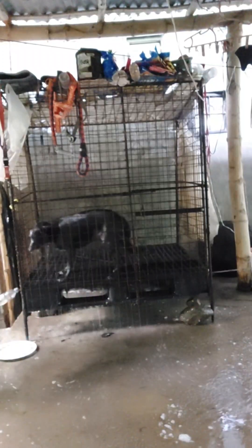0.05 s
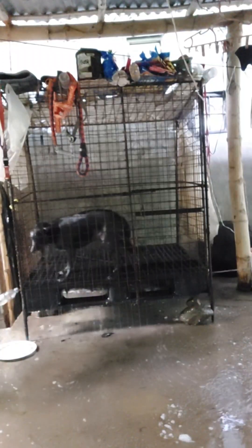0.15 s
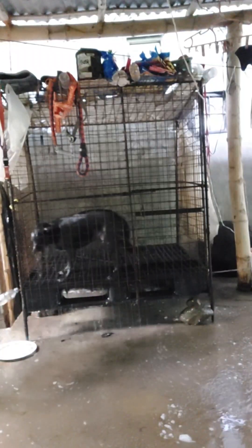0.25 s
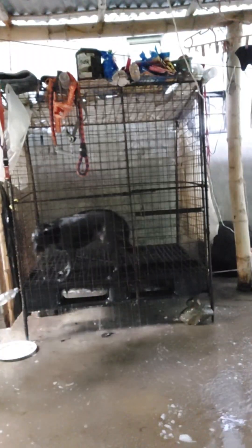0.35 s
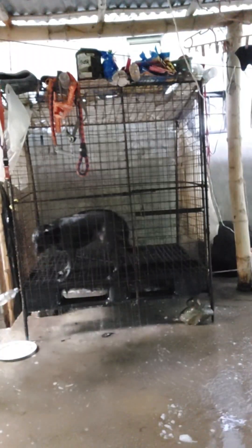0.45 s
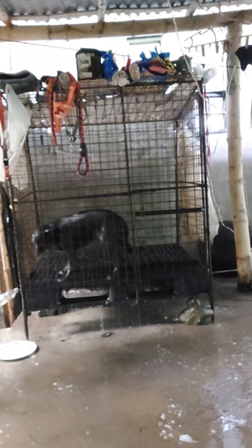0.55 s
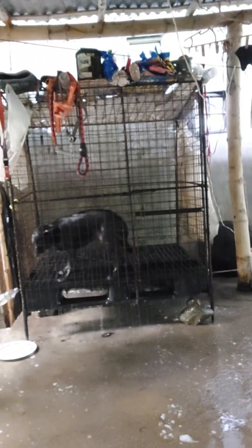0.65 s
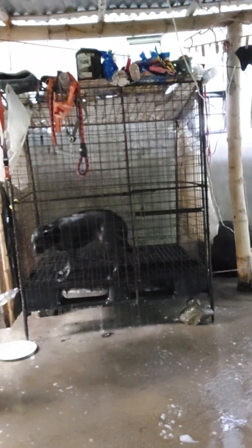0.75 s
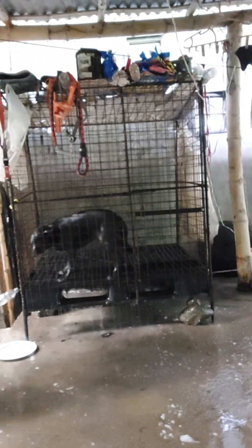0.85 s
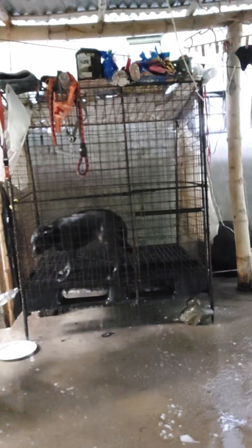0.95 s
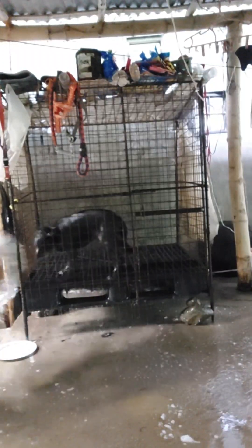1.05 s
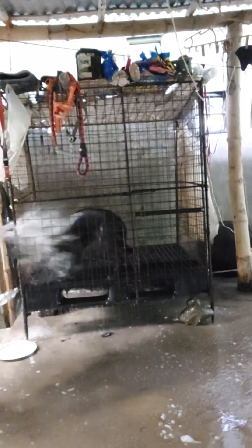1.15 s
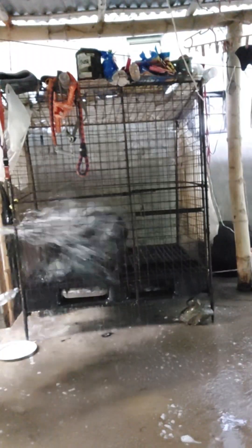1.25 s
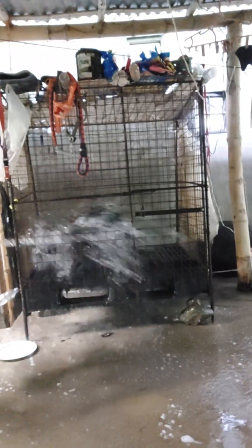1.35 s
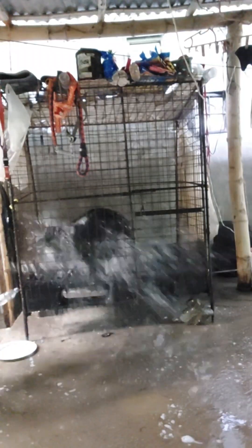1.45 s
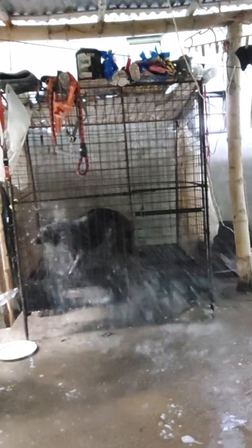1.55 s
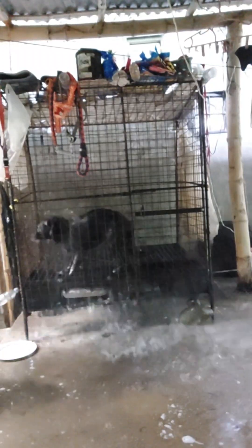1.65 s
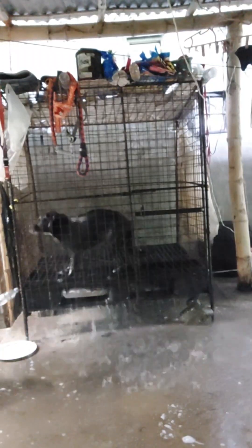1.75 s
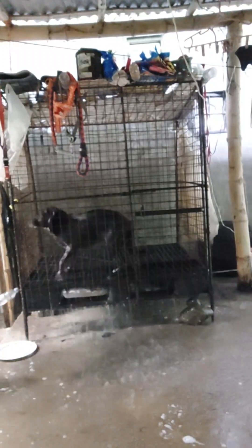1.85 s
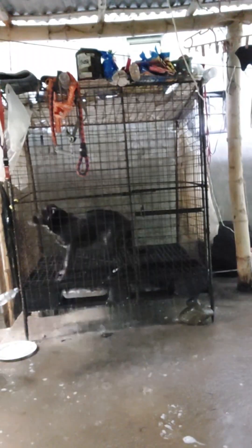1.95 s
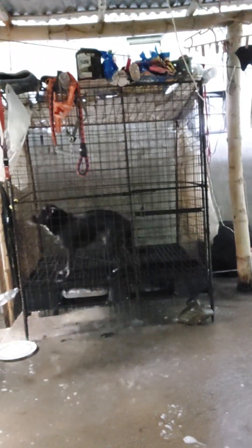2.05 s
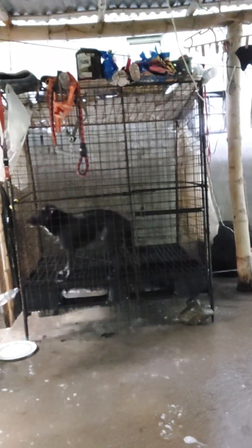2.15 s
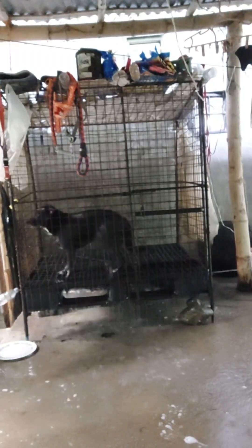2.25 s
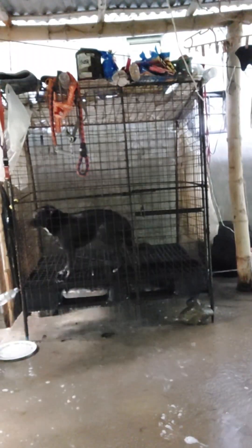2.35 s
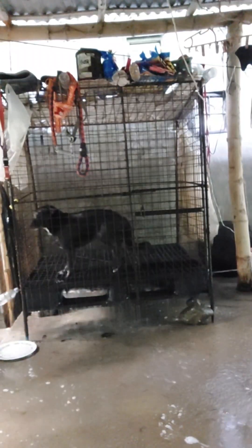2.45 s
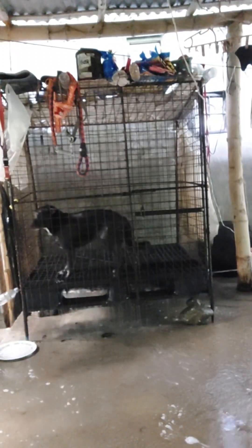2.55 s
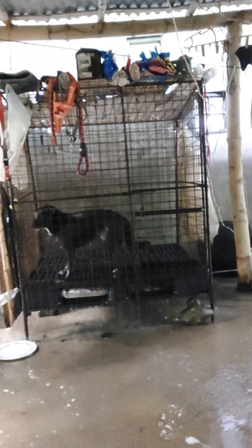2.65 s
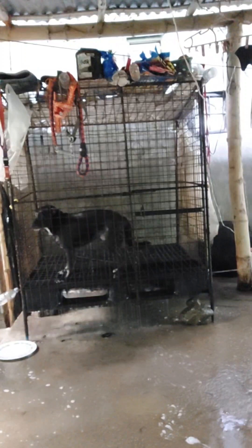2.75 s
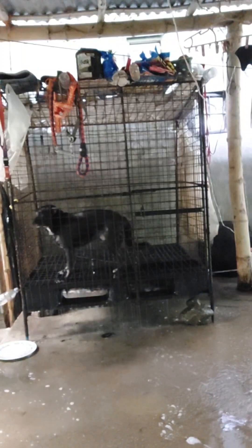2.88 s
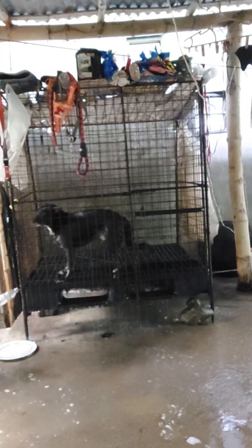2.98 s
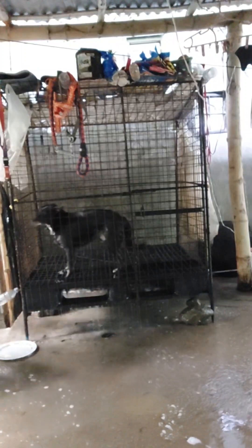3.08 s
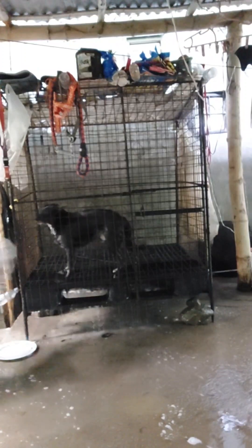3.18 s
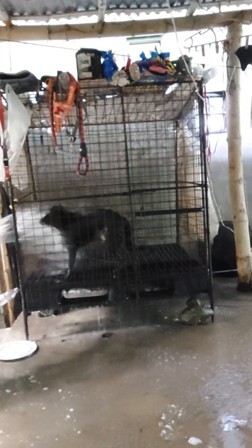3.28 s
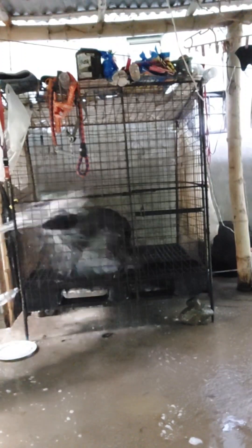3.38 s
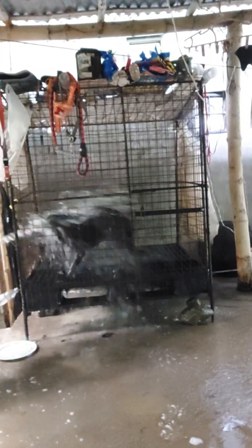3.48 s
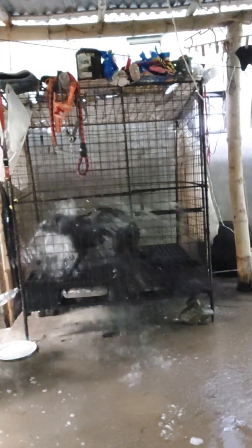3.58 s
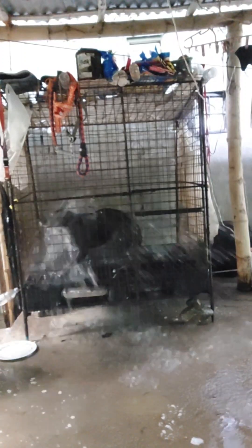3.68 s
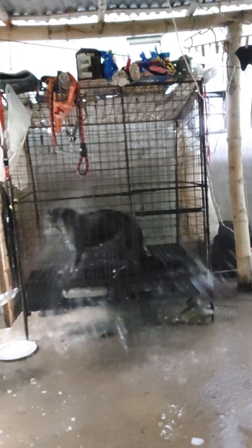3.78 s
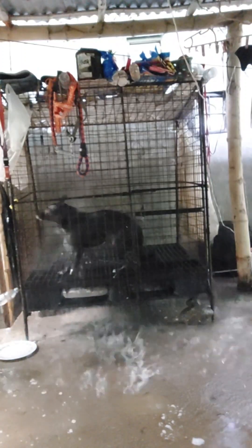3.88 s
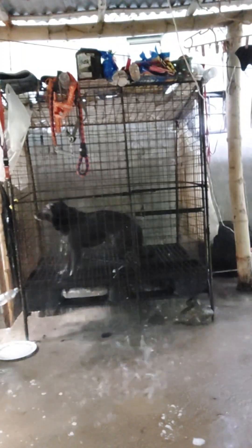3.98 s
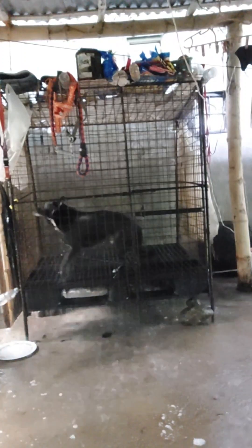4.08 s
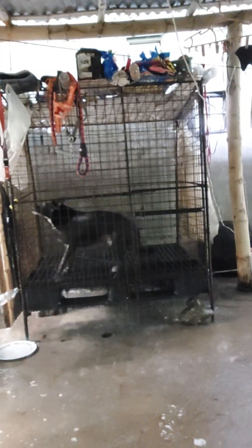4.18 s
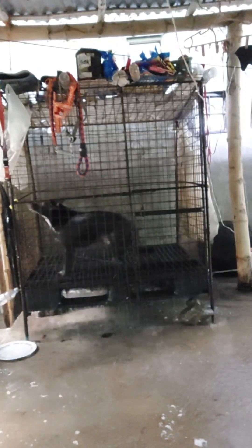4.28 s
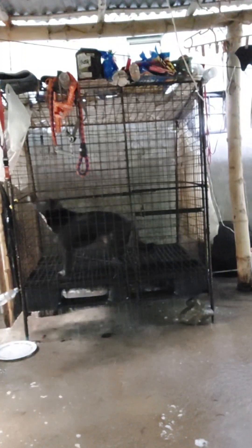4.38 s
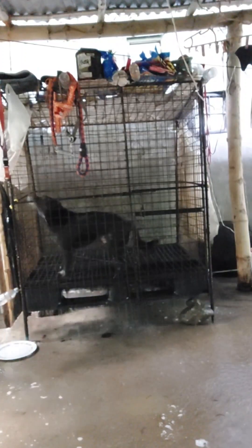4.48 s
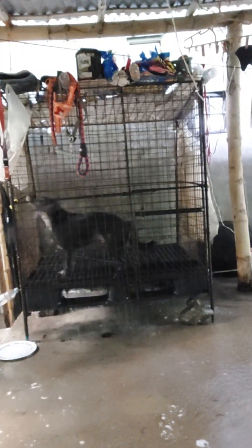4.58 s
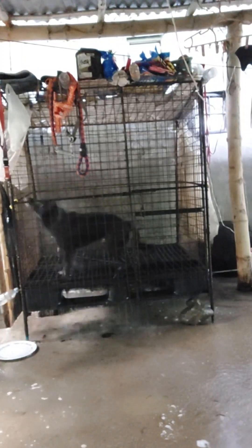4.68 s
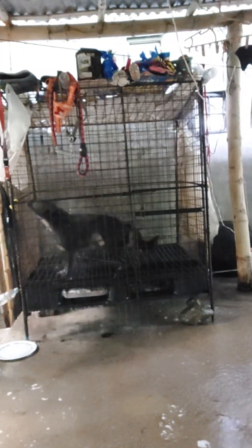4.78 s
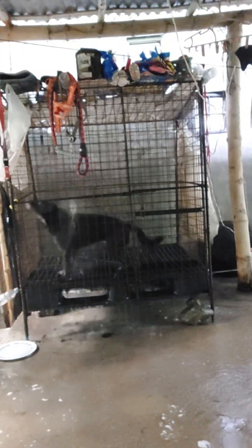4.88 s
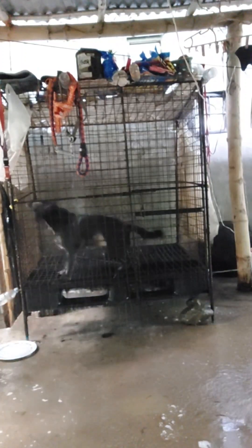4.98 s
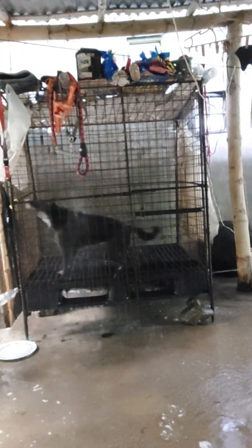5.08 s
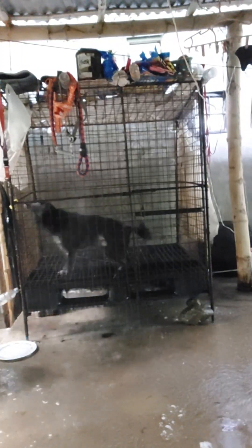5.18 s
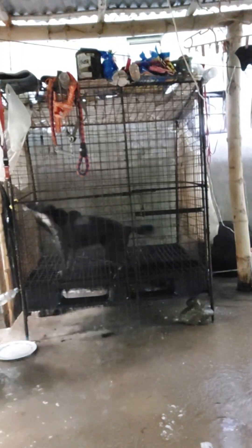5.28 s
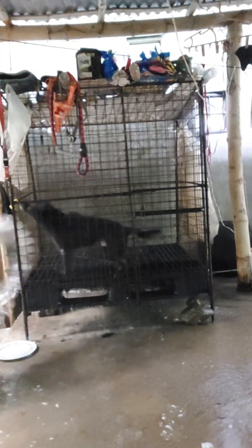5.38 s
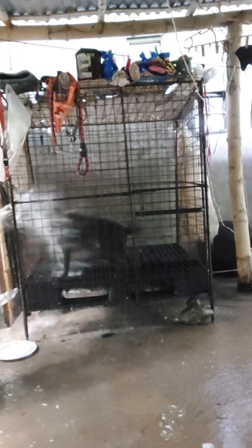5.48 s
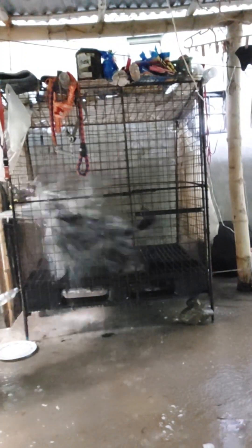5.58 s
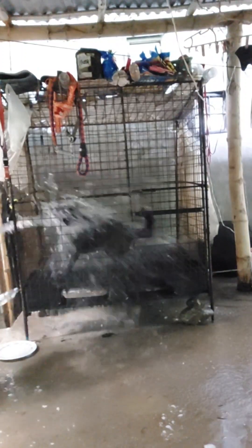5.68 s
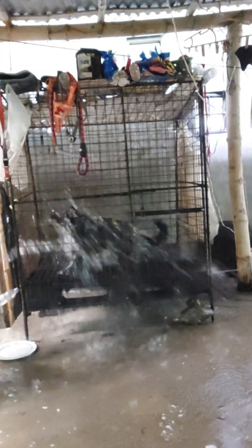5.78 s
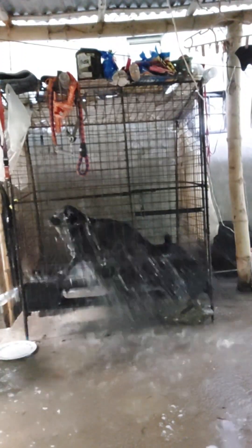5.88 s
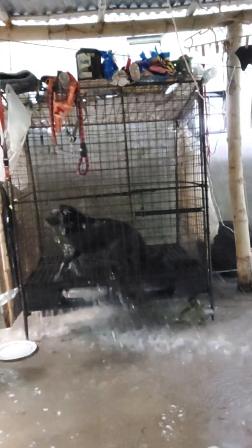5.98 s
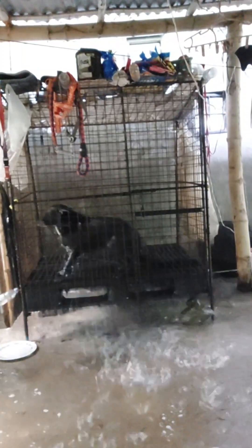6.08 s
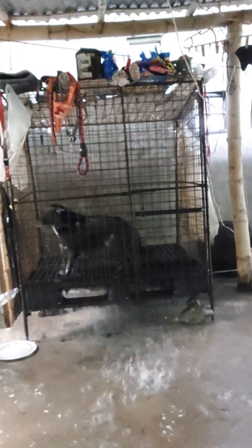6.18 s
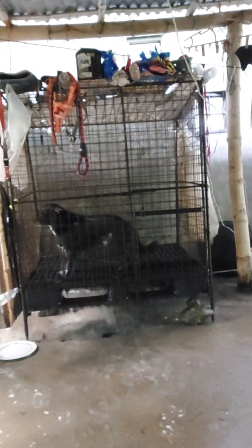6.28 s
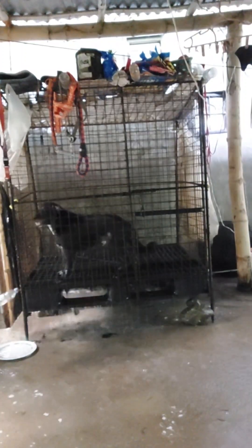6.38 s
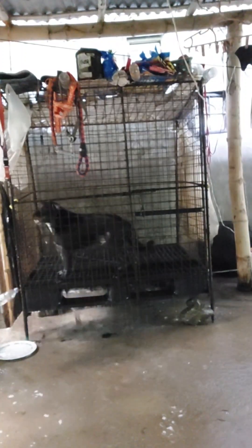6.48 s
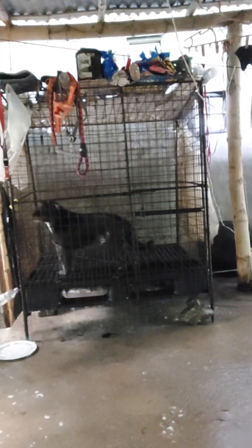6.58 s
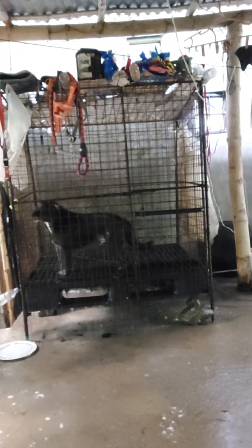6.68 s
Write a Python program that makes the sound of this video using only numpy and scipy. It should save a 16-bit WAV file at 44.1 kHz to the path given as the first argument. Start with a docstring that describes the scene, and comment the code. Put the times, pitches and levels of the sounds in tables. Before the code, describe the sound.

Water is thrown three times in a shed, bursting sharply then spattering down, between drips and gurgles; insects hiss and distant traffic rumbles.

```python
"""Under a shed roof, microphones near a wet concrete floor: drops plop and the scoop stirs its bucket.
Then three times a scoop of water bursts on a wire cage and, a moment later, rains down on the floor.
After each throw the cage drips, water sloshes and bubbles ring, and the scoop knocks on the bucket;
slaps are bursts of shaped noise, bubbles and bucket are ringing sines, the falling water is random drops.
All along, cicadas hiss and far traffic rumbles as coloured noise; a distant aircraft tone slowly sinks."""
import sys
import numpy as np
from scipy import signal
from scipy.fft import rfft, irfft
from scipy.io import wavfile

SR = 44100
rng = np.random.default_rng(int(sys.argv[2]) if len(sys.argv) > 2 else 0)


def wav_record(signal):
    """Record a signal, one row per channel, as 16-bit PCM in the file named by sys.argv[1]."""
    frames = np.transpose(np.atleast_2d(signal))
    bounded = np.clip(frames, -1, 1)
    # unit amplitude maps onto the largest positive 16-bit level
    quanta = np.round(bounded * 32767).astype(np.int16)
    wavfile.write(sys.argv[1], SR, quanta)


N = 297057   # samples

# Relative spectra of fine mist, sheets of water, and gurgling bubbles: pitch_hz, level_db (per Hz)
MIST_SPECTRUM = [(2350, -11.5), (4000, -9.5), (6240, 3), (8650, -0.5), (15100, 7), (16200, -22),
                 (16500, -50)]
SHEET_SPECTRUM = [(900, -19), (1500, -10), (2200, 1), (3500, 1), (5000, 4), (7000, -3), (10000, -31)]
GURGLE_SPECTRUM = [(250, 8), (450, -2), (700, 1.5), (1100, -1.5), (1700, 0), (2500, -4), (4000, -10)]
GUST_CORNER_HZ = 22
GUST_MIST_DB, GUST_SHEETS_DB, GUST_GURGLE_DB = 1.2, 1.6, 1.5   # per unit of gust


def falling_water():
    """Mist crackles, sheets of water fizz, pool and bucket gurgle with bubbles that ring longer."""
    sheet_level, mist_level, gurgle_level = water_levels()
    gusts = np.clip(drift(GUST_CORNER_HZ), -2, 2)      # water lands in handfuls, all sizes at once
    mist = droplets(MIST_SPECTRUM, per_s=4000, uneven_db=2.5, cycles=2.3, clump_db=1.0, count=8)
    sheets = droplets(SHEET_SPECTRUM, per_s=1800, uneven_db=2.0, cycles=8.2, clump_db=2.0, count=12)
    small = droplets(SHEET_SPECTRUM, per_s=1500, uneven_db=2.0, cycles=73.0, clump_db=2.5, count=36)
    large = droplets(GURGLE_SPECTRUM, per_s=1000, uneven_db=2.5, cycles=42.0, clump_db=2.5, count=30)
    large = large + 0.21 * large[::-1]      # deep bubbles reach both microphones
    fizz = from_db(-6.5) * sheets + from_db(-5.0) * small

    mist_gain = mist_level * from_db(GUST_MIST_DB * gusts)
    fizz_gain = sheet_level * from_db(GUST_SHEETS_DB * gusts)
    gurgle_gain = gurgle_level * from_db(GUST_GURGLE_DB * gusts)
    return (mist_gain * panned(-2.0)[:, None] * mist
            + fizz_gain * panned(-0.095)[:, None] * fizz
            + gurgle_gain * panned(-0.79)[:, None] * large)


# In these three tables full_s is the moment the water reaches its full level.
# Each scoopful bursts on the wire cage:
# full_s, hold_s, sheets_db, mist_db, sheets_fade_db_per_s, mist_fade_db_per_s
CAGE_BURSTS = [(1.184, 0.017, -33.5, -34.5, 23, 14), (3.375, 0.062, -33, -33, 51, 39),
               (5.53, 0.068, -31.5, -33.5, 105, 18)]
# Then it rains down on the floor: full_s, hold_s, sheets_db, mist_db, rise_db_per_s, fade_db_per_s
FLOOR_LANDINGS = [(1.589, 0.19, -33, -30, 260, 296), (3.794, 0.16, -42, -34.5, 106, 112),
                  (6.013, 0.086, -30, -28, 152, 102)]
# The scoop stirs bucket and puddle: full_s, hold_s, gurgle_db, sheets_db
SCOOP_SLOSHES = [(0.0, 0.024, -47, -47), (0.182, 0.047, -45.5, -42), (1.198, .01, -48, -46),
                 (1.297, 0.047, -45.5, -36), (1.44, 0.1, -43.5, -40), (1.57, 0.0088, -42, -56),
                 (1.874, 0.018, -44.5, -38), (2.11, 0.11, -46.5, -48.5), (2.247, 0.26, -52.5, -62),
                 (2.542, .03, -49, -45), (3.357, 0.028, -43.5, -42), (3.603, 0.15, -47.5, -63),
                 (3.753, 0.32, -47, -44.5), (4.095, 0.41, -46.5, -53), (4.511, 0.16, -43, -42),
                 (4.79, 0.22, -52.5, -59), (5.124, 0.27, -47.5, -55), (5.52, 0.09, -39.5, -37),
                 (5.765, 0.56, -48, -42.5), (6.45, 0.034, -45, -50), (6.628, 0.14, -48.5, -61)]
BURST_RISE_DB_PER_S = 900
EARLIER_THROW_S = -0.56   # end of the throw before
DRIP_SHEETS_DB, DRIP_MIST_DB, DRIP_FADE_DB_PER_S = -47.5, -44, 5.5
SLOSH_RISE_DB_PER_S, SLOSH_FADE_DB_PER_S = 309, 89


def water_levels():
    """Amplitudes of sheets, mist and gurgle: throws, drips and sloshes add in power."""
    sheets = mist = gurgle = 0
    for full_s, hold, sheets_db, mist_db, sheets_fade, mist_fade in CAGE_BURSTS:
        sheets = sheets + swell(full_s, hold, sheets_db, BURST_RISE_DB_PER_S, sheets_fade)
        mist = mist + swell(full_s, hold, mist_db, BURST_RISE_DB_PER_S, mist_fade)
    for full_s, hold, sheets_db, mist_db, rise, fade in FLOOR_LANDINGS:
        sheets = sheets + swell(full_s, hold, sheets_db, rise, fade)
        mist = mist + swell(full_s, hold, mist_db, rise, fade)
    # the wet cage drips after each landing
    drips_full_s = [EARLIER_THROW_S] + [full_s + hold for full_s, hold, *rest in FLOOR_LANDINGS]
    for full_s in drips_full_s:
        sheets = sheets + swell(full_s, 0, DRIP_SHEETS_DB, BURST_RISE_DB_PER_S, DRIP_FADE_DB_PER_S)
        mist = mist + swell(full_s, 0, DRIP_MIST_DB, BURST_RISE_DB_PER_S, DRIP_FADE_DB_PER_S)
    for full_s, hold, gurgle_db, sheets_db in SCOOP_SLOSHES:
        gurgle = gurgle + swell(full_s, hold, gurgle_db, SLOSH_RISE_DB_PER_S, SLOSH_FADE_DB_PER_S)
        sheets = sheets + swell(full_s, hold, sheets_db, SLOSH_RISE_DB_PER_S, SLOSH_FADE_DB_PER_S)
    return [np.repeat(np.sqrt(power), 32)[:N] for power in (sheets, mist, gurgle)]


def swell(full_s, hold, level_db, rise_db_per_s, fade_db_per_s):
    """Power of one wave of water, every 32 samples: it rises until full_s, holds and fades."""
    t = np.arange(0, N, 32) / SR - full_s
    below_db = rise_db_per_s * np.maximum(-t, 0) + fade_db_per_s * np.maximum(t - hold, 0)
    return from_db(2 * (level_db - below_db))      # doubled dB: power


def droplets(spectrum, per_s, uneven_db, cycles, clump_db, count):
    """Drops land at random all over the floor; each rings a few cycles at a pitch set by its size."""
    strengths = from_db(uneven_db * np.minimum(rng.exponential(1, (2, N)), 5))
    signed = strengths * rng.choice([-1, 1], (2, N))
    landed = signed * (rng.random((2, N)) < per_s / SR)
    size_index = rng.integers(0, count, (2, N))
    out = 0
    for k, hz in enumerate(np.geomspace(spectrum[0][0], spectrum[-1][0], count)):
        # drops of one size come in clumps; equal energy per Hz before the colouring
        one_size = rms_one(ring(landed * (size_index == k), hz, cycles / hz)) * np.sqrt(hz)
        out = out + one_size * from_db(clump_db * drift(8.0))
    return coloured(out, spectrum)


# Sudden slaps of water on cage, floor and bucket, levels before edge and fade:
# start_s, fizz_db, centre_hz, t60_s, mist_db
WATER_SLAPS = [(0.376, -39, 4830, 0.14, -46), (0.556, -40, 5000, 0.23, -55), (1.173, -42, 3110, 0.14, -33),
               (1.197, -20.5, 2460, 0.085, -21), (1.446, -23.5, 4160, 0.079, -28),
               (1.485, -27.5, 1550, 0.09, -25), (1.703, -29, 4000, 0.27, -32),
               (1.725, -22, 4130, 0.14, -39), (1.75, -32.5, 3600, 0.19, -29),
               (1.907, -34.5, 1110, 0.18, -43), (1.928, -33.5, 2640, 0.085, -32.5),
               (2.076, -34, 3670, 0.079, -59), (2.105, -37.5, 1800, 0.21, -50),
               (2.979, -45.5, 5960, 0.56, -42), (3.315, -41, 5660, 0.35, -34.5),
               (3.367, -29.5, 4730, 0.25, -30), (3.75, -34, 2140, 0.14, -47), (3.819, -32, 4730, 0.14, -31),
               (3.834, -32.5, 2280, 0.075, -45), (3.928, -37, 3640, 0.23, -30),
               (3.991, -33.5, 1380, 0.056, -28), (4.009, -35, 1020, 0.15, -26.5),
               (4.011, -36.5, 2500, 0.15, -45), (4.063, -33.5, 920, 0.092, -44),
               (4.192, -42, 2100, .12, -50), (4.67, -32, 900, .09, -38), (4.749, -41.5, 2150, 0.45, -50),
               (4.934, -42.5, 1920, 0.14, -52), (5.113, -38.5, 1870, 0.16, -41),
               (5.139, -40, 6030, 0.33, -32), (5.247, -39, 2100, 0.2, -39), (5.294, -38.5, 2200, .1, -50),
               (5.365, -41.5, 5000, 0.58, -36), (5.487, -48, 4000, 0.68, -30.5),
               (5.527, -22.5, 1710, .15, -34), (5.587, -24, 4570, 0.13, -36),
               (5.685, -33.5, 3000, 0.1, -36), (5.921, -30.5, 4170, .12, -30),
               (6.023, -29.5, 4860, 0.4, -29), (6.222, -32.5, 4000, 0.12, -40),
               (6.293, -37.5, 860, 0.1, -41), (6.372, -34, 3630, 0.13, -44), (6.463, -32, 1020, 0.39, -44)]
SLAP_OCTAVES, SLAP_EDGE_S = 0.78, 0.00072


def slaps():
    """A mass of water bursts: a quick edge, then a fizz that dies, with mist on top."""
    out, t = np.zeros((2, N + SR)), np.arange(SR // 4) / SR
    mist_filter = signal.butter(2, 8000, "high", fs=SR, output="sos")
    edge = 1 - np.exp(-t / SLAP_EDGE_S)
    for s, fizz_db, hz, t60, mist_db in WATER_SLAPS:
        burst = rng.standard_normal((2, len(t))) ** 3      # spiky noise
        band_hz = hz * 2 ** (SLAP_OCTAVES * np.array([-.5, .5]))
        fizz_filter = signal.butter(1, band_hz, "band", fs=SR, output="sos")
        fizz = from_db(fizz_db) * rms_one(signal.sosfilt(fizz_filter, burst))
        mist = from_db(mist_db) * rms_one(signal.sosfilt(mist_filter, burst))
        fade = from_db(-60 * t / max(t60, .01))
        at = round(s * SR)
        out[:, at:at + len(t)] += panned(-2.2)[:, None] * (fizz + mist) * edge * fade
    return out[:, :N]


# Single drops bursting close by, level before the high-pass: start_s, level_db, left_minus_right_db
NEAR_DROPS = [(0.425, -32, -3.5), (1.1952, -24, -2.5), (2.0323, -30, -2.5), (2.23, -26, -2.5),
              (2.701, -26, -2.0), (2.9736, -29, -3.0), (3.3907, -24, -2.0), (3.8174, -19, -3.0),
              (4.014, -18, -1.5), (4.3231, -35, -5), (5.1382, -26, -2.5), (5.152, -22, -8),
              (5.3632, -30, -3.0), (5.3994, -21, -5), (5.8716, -19, -4), (6.0202, -32, -4.0),
              (6.131, -18, -1), (6.257, -23, -4.0), (6.5296, -28, 5)]
TICK_LOW_HZ, TICK_T60_S = 5000, 0.005


def ticks():
    """A near drop bursts as one bright click of fast-fading noise."""
    out, t = np.zeros((2, N + SR)), np.arange(SR // 50) / SR
    bursts = rng.standard_normal((len(NEAR_DROPS), len(t))) * from_db(-60 * t / TICK_T60_S)
    for (s, level_db, pan_db), burst in zip(NEAR_DROPS, bursts):
        at = round(s * SR)
        out[:, at:at + len(t)] += from_db(level_db) * panned(pan_db)[:, None] * burst
    return signal.sosfilt(signal.butter(2, TICK_LOW_HZ, "high", fs=SR, output="sos"), out[:, :N])


# Single plops in standing water, level before the swell-in and panning: start_s, level_db, pitch_hz
WATER_PLOPS = [(0.006, -41, 810), (0.076, -37.5, 802), (0.166, -30.5, 2480), (0.206, -49, 944),
               (0.257, -37, 2240), (0.398, -38, 2230), (1.306, -29.5, 2060), (1.359, -34, 2250),
               (1.409, -41.5, 760), (1.582, -23, 1870), (1.599, -24, 1720), (1.618, -26.5, 2260),
               (1.844, -41, 1400), (1.879, -45, 555), (2.259, -38.5, 1640), (2.349, -35, 1746),
               (2.378, -39, 888), (2.563, -37, 1504), (3.364, -40, 817), (3.607, -36, 2800),
               (3.843, -37, 660), (3.908, -39.5, 873), (4.066, -42, 602), (4.2, -38.5, 536),
               (4.297, -38.5, 1340), (4.429, -39, 670), (4.536, -29, 583), (4.668, -34.5, 948),
               (4.699, -37, 650), (4.862, -38.5, 865), (5.012, -42, 540), (5.185, -39.5, 545),
               (5.31, -40, 539), (5.36, -36, 554), (5.449, -39.5, 540), (5.901, -31, 1850),
               (5.969, -42.5, 560), (6.292, -41, 580), (6.509, -36, 744), (6.645, -35.5, 984)]


def plops():
    """A trapped bubble swells in, rings and climbs in pitch; a smaller neighbour follows."""
    out, t = np.zeros(N + SR), np.arange(SR // 4) / SR
    chance = rng.random((len(WATER_PLOPS), 2))
    for (s, level_db, hz), (higher, later) in zip(WATER_PLOPS, chance):
        t60 = 0.043 + 38.0 / hz      # lower bubbles ring longer
        swing = (1 - np.exp(-t / 0.001)) * from_db(level_db - 60 * t / t60)
        at = round(s * SR)
        out[at:at + len(t)] += swing * np.sin(2 * np.pi * hz * t * (1 + 1.24 * t))
        # the neighbour comes up to 22 ms later, 2 to 10 % higher and steady
        at += round(0.022 * later * SR)
        neighbour_hz = hz * (1.02 + 0.08 * higher)
        out[at:at + len(t)] += from_db(-10.0) * swing * np.sin(2 * np.pi * neighbour_hz * t)
    return out[:N]


# Scoop against the bucket, level before the band-pass: start_s, level_db
SCOOP_KNOCKS = [(2.137, -34), (2.167, -37.5), (2.208, -45), (4.017, -40), (4.063, -36), (4.192, -37),
                (4.364, -43), (5.307, -39.5), (5.6, -52), (5.709, -43.5), (6.289, -44.5), (6.464, -35),
                (6.597, -43.5)]
# Modes of the bucket, level added to the knock's: pitch_hz, level_db, t60_s
BUCKET_MODES = [(273, 7, 0.13), (299.5, -1.5, 0.38), (347, -6, 0.15), (435, -4, .1)]


def bucket():
    """Each soft knock strikes every mode of the bucket with a strength of its own."""
    at, out = [round(s * SR) for s, db in SCOOP_KNOCKS], np.zeros(N)
    knock_db = np.array(SCOOP_KNOCKS)[:, 1]
    for hz, level_db, t60 in BUCKET_MODES:
        clicks = np.zeros(N)
        clicks[at] = from_db(knock_db + level_db + rng.normal(0, 2.0, len(at)))
        out += ring(clicks, hz, t60)
    # the water-filled wall takes a few ms to swing up
    return signal.sosfilt(signal.butter(2, [255, 400], "band", fs=SR, output="sos"), out)


SHED_T60_S, SHED_DB = 0.18, -5


def shed(x):
    """Roof, wall and floor answer with a short dense tail, another one at each microphone."""
    t = np.arange(SR // 2) / SR
    tail = rng.standard_normal((2, len(t))) * from_db(-60 * t / SHED_T60_S) * (t > .003)
    tail = tail / np.sqrt(np.sum(tail ** 2, axis=1, keepdims=True))      # unit energy
    return from_db(SHED_DB) * signal.fftconvolve(x, tail, axes=1)[:, :N]


# Relative spectrum of the insects in the trees: pitch_hz, level_db (per Hz)
CICADA_SPECTRUM = [(1470, -96), (2500, -26), (2930, -41), (3300, -25), (3920, -61), (4630, -20),
                   (5090, -39.5), (6150, -4.5), (6710, -1), (7260, 5.5), (8700, -3.5), (10700, -16),
                   (15100, -18.5), (16100, -21), (16500, -60)]
CHORUS_DB = -36


def cicadas():
    """Many insects blend into a diffuse coloured hiss whose level flickers."""
    return from_db(CHORUS_DB + 0.78 * drift(8.7)) * far_noise(CICADA_SPECTRUM)


# Relative spectrum of the far road: pitch_hz, level_db (per Hz)
TRAFFIC_SPECTRUM = [(18, -40), (30, -12), (50, -5), (70, 2), (98, -1), (125, 2.5), (160, -4), (188, -6.5),
                    (240, 3), (290, -11), (420, -17.5), (655, -28), (800, -42), (1300, -38), (2300, -66)]
TRAFFIC_START_DB, TRAFFIC_SWELL_DB_PER_S = -47.5, .5


def traffic():
    """Far traffic is a diffuse low rumble that slowly swells and wavers a little."""
    level_db = TRAFFIC_START_DB + TRAFFIC_SWELL_DB_PER_S * np.arange(N) / SR
    return from_db(level_db + 0.2 * drift(11.0)) * far_noise(TRAFFIC_SPECTRUM)


# Times between which the distant tone's level glides, before wavering and panning: at_s, level_db
AIRCRAFT_LEVEL = [(0, -46.5), (.45, -66), (.9, -57), (1.4, -50.5), (2, -46.5), (3.5, -44), (5, -44.5),
                  (6.74, -46.5)]
AIRCRAFT_START_HZ, SINK_HZ_PER_S = 260.2, 3.5


def aircraft():
    """One engine tone, sinking in pitch and wavering as it crosses the air."""
    level_db, = in_time(AIRCRAFT_LEVEL)
    hz = AIRCRAFT_START_HZ - SINK_HZ_PER_S * np.arange(N) / SR
    phase = 2 * np.pi * np.cumsum(hz) / SR + .5 * drift(4)
    return np.sqrt(2) * from_db(level_db + 0.61 * drift(3.0)) * np.sin(phase)


# How alike far sound is at the two microphones: pitch_hz, likeness (-1 to 1, clipped)
FAR_LIKENESS = [(60, 0.9), (180, 0.96), (550, 0.79), (1650, -1.5), (4970, 0.077), (15000, 0.1)]
# Balance of far sound between the microphones: pitch_hz, left_minus_right_db
FAR_BALANCE = [(60, 0), (200, -1), (700, 3), (4400, -11), (8100, -0.5), (15000, -2)]


def far_noise(spectrum):
    """Diffuse sound: alike at both microphones in the bass, nearly unrelated in the treble."""
    hz = np.maximum(np.fft.rfftfreq(2 ** 19, 1 / SR), 1)
    mid, side = rfft(rng.standard_normal((2, 2 ** 19)))
    alike = np.clip(at_hz(FAR_LIKENESS, hz), -1, 1)
    both = np.sqrt(1 + alike) * mid + np.sqrt(1 - alike) * side * [[1], [-1]]
    shaped = both * from_db(at_hz(spectrum, hz)) * panned(at_hz(FAR_BALANCE, hz))
    return rms_one(irfft(shaped)[:, :N])


def ring(clicks, hz, t60):
    """A unit click sets a decaying sine ringing, of height 1 before its decay."""
    r, w = from_db(-60 / (t60 * SR)), 2 * np.pi * hz / SR
    return signal.lfilter([0, np.sin(w)], [1, -2 * r * np.cos(w), r * r], clicks + 1e-18)


def drift(corner_hz):
    """Slow random wander of spread 1: noise through two equal low-pass poles, every 40 samples."""
    r = np.exp(-80 * np.pi * corner_hz / SR)
    noise = rng.standard_normal(N // 40 + 2002)
    slow = signal.lfilter([1], [1, -2 * r, r * r], noise)[2000:]      # skip the filter's run-in
    return np.interp(np.arange(N) / 40, np.arange(len(slow)), rms_one(slow - slow.mean()))


def coloured(x, spectrum):
    """Steady colouring of a dense stream; rms 1."""
    hz = np.maximum(np.fft.rfftfreq(2 ** 19, 1 / SR), 1)
    return rms_one(irfft(rfft(x, 2 ** 19) * from_db(at_hz(spectrum, hz)))[..., :N])


def at_hz(points, hz):
    """A spectrum read on a log-frequency axis."""
    point_hz, value = np.array(points).T
    return np.interp(np.log(hz), np.log(point_hz), value)


def in_time(rows):
    """Columns of a curve table, one value per sample."""
    s, *columns = np.transpose(rows)
    return [np.interp(np.arange(N) / SR, s, c) for c in columns]


def panned(left_minus_right_db):
    """Left and right gains."""
    return from_db(np.multiply.outer([.5, -.5], left_minus_right_db))


def rms_one(x):
    """Scaled to rms 1."""
    return x / np.sqrt(np.mean(x ** 2) + 1e-20)


def from_db(db):
    """Gain of a level."""
    return 10 ** (np.asarray(db) / 20)


def scene():
    """Near water in the shed, far sounds around it."""
    near = falling_water() + slaps() + ticks()
    near = near + panned(-1.6)[:, None] * plops() + panned(-2.0)[:, None] * bucket()
    far = cicadas() + traffic() + panned(-6.5)[:, None] * aircraft()
    return near + shed(near) + far


CUTOFF_HZ = 15950


def record(dry):
    """The left microphone hears the scene a little late; deepest bass fades, the top is cut steeply."""
    microphones = np.stack([np.roll(dry[0], 4), dry[1]])      # 4 samples late
    microphones = signal.sosfilt(signal.butter(2, 45, "high", fs=SR, output="sos"), microphones)
    return signal.sosfilt(signal.ellip(12, .3, 75, CUTOFF_HZ, fs=SR, output="sos"), microphones)


dry = scene()
out = record(dry)
wav_record(out)
```